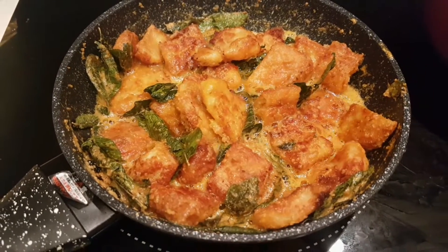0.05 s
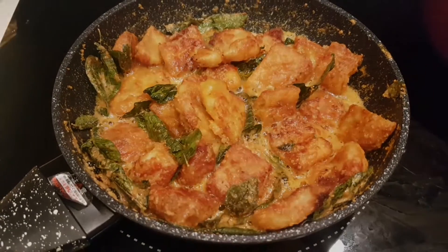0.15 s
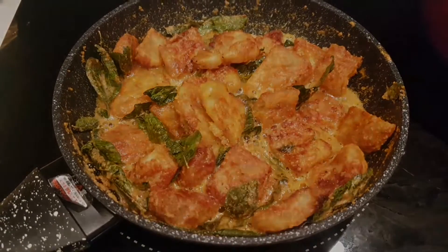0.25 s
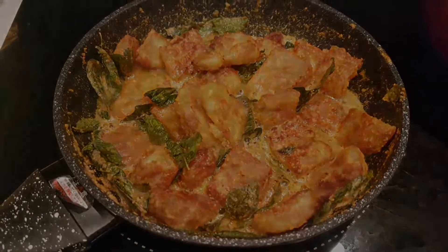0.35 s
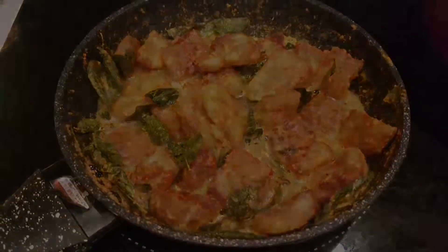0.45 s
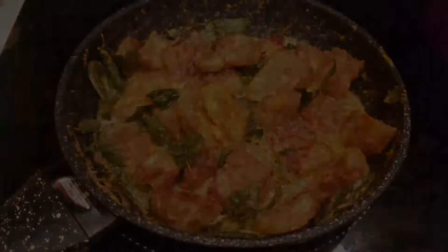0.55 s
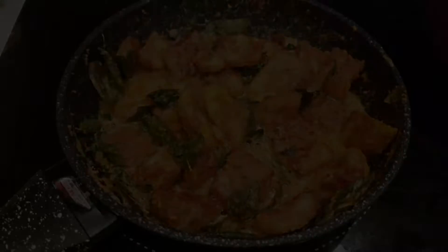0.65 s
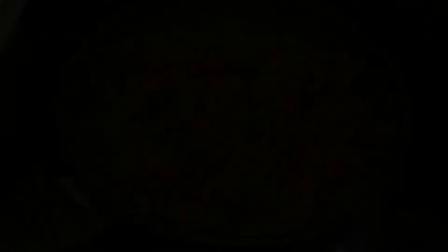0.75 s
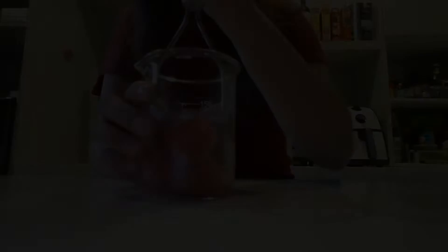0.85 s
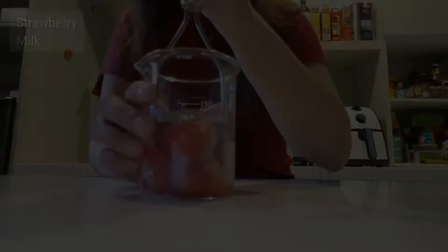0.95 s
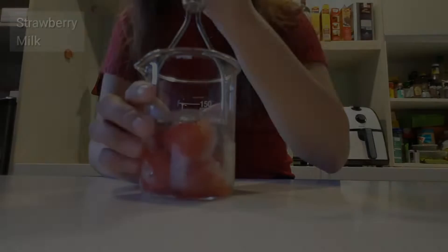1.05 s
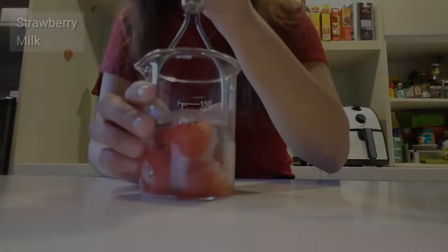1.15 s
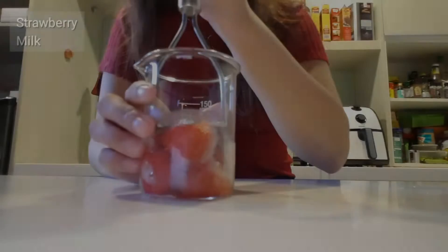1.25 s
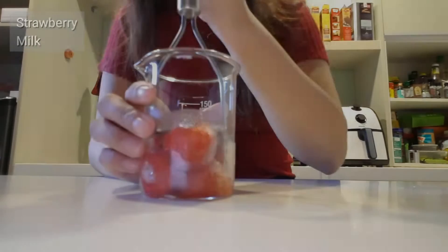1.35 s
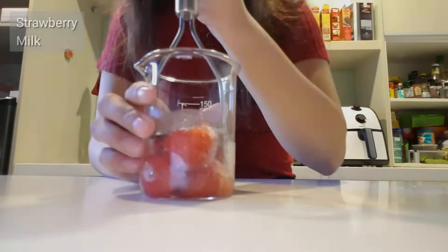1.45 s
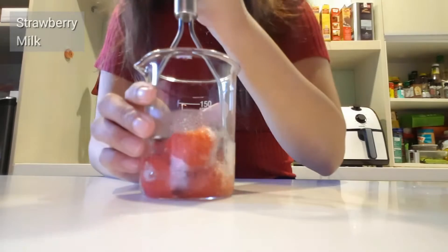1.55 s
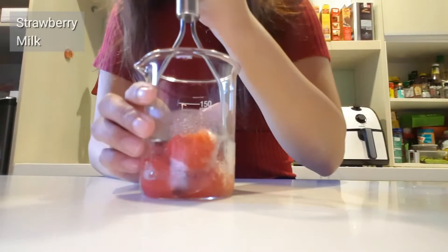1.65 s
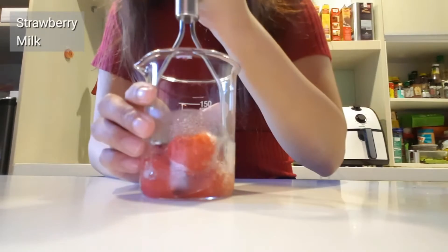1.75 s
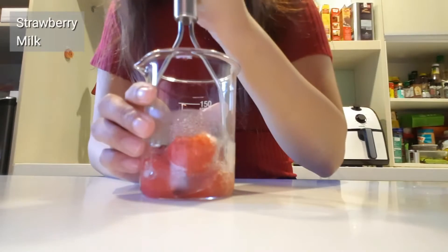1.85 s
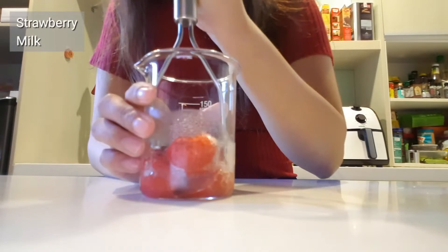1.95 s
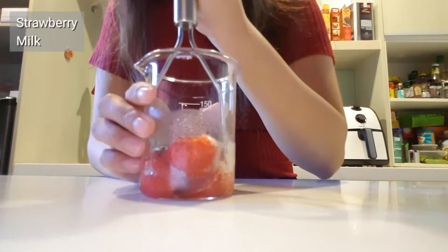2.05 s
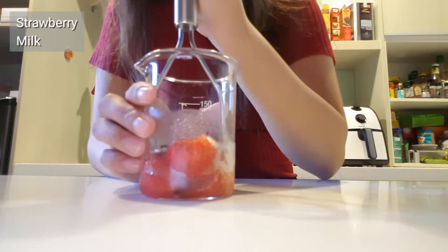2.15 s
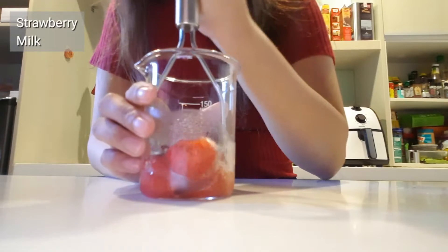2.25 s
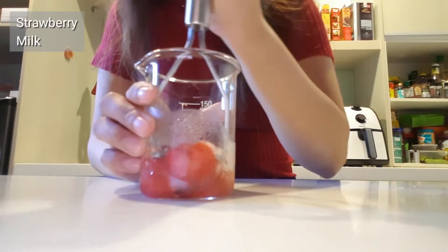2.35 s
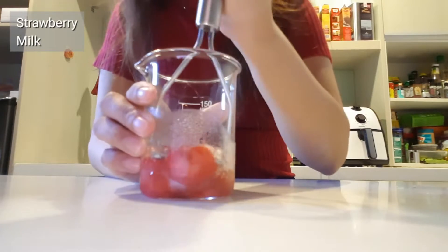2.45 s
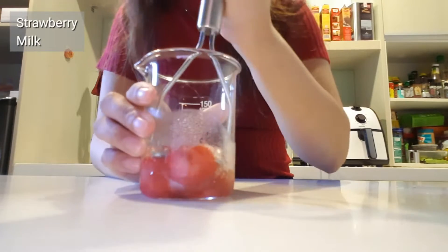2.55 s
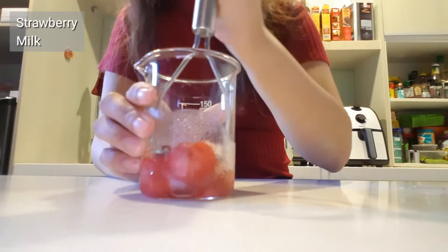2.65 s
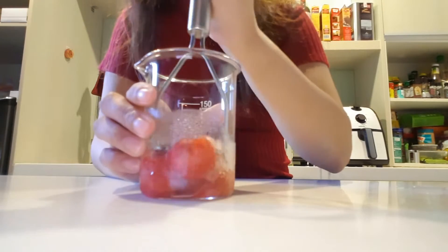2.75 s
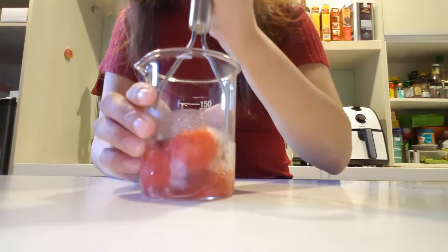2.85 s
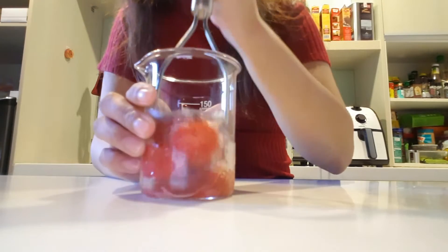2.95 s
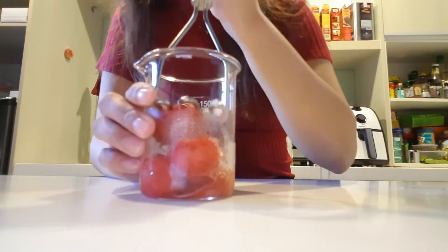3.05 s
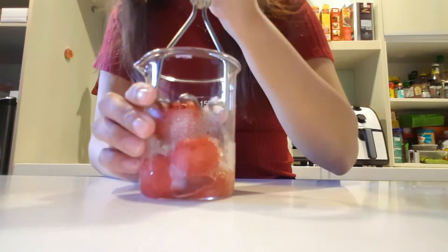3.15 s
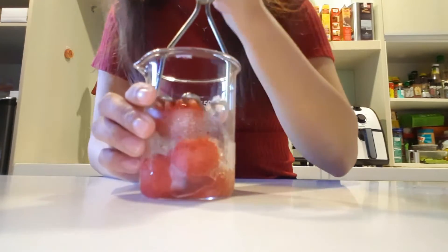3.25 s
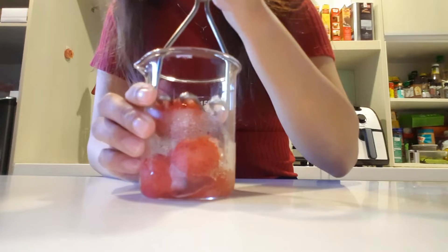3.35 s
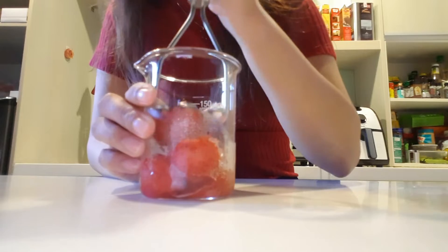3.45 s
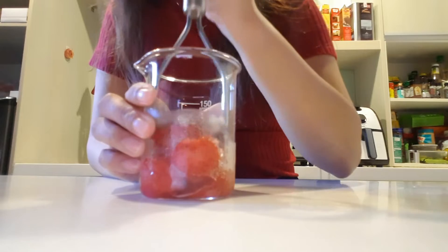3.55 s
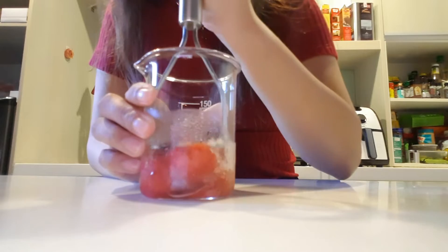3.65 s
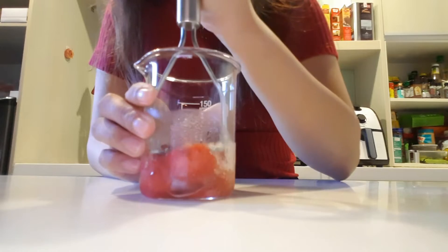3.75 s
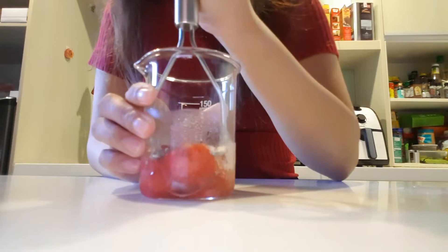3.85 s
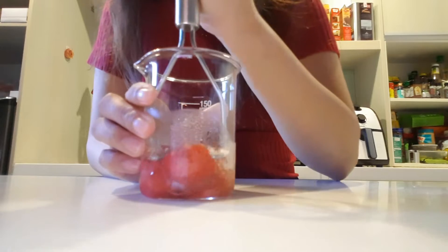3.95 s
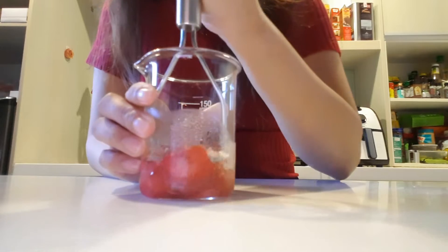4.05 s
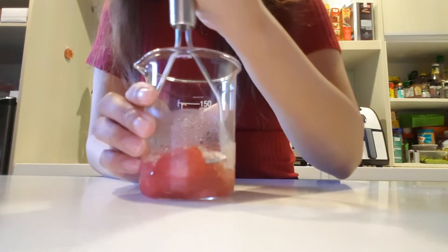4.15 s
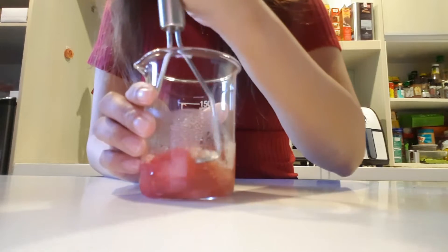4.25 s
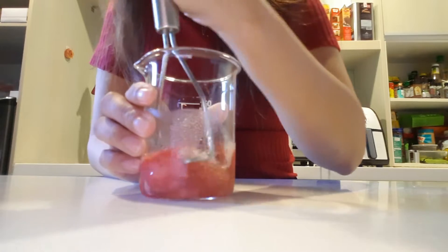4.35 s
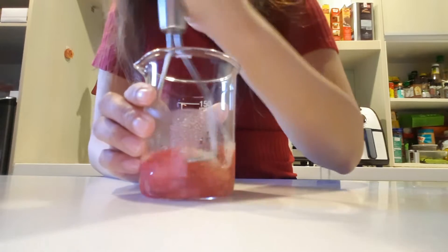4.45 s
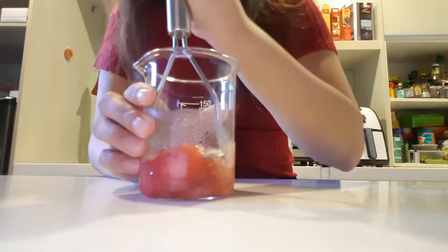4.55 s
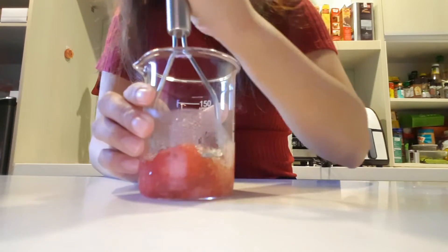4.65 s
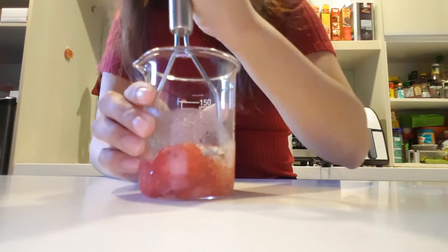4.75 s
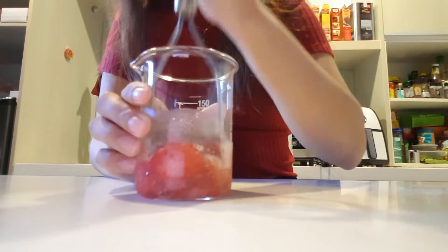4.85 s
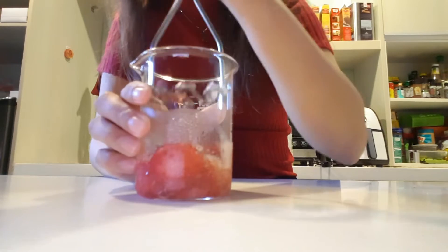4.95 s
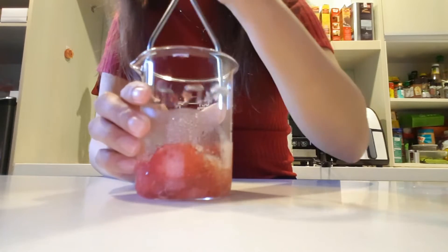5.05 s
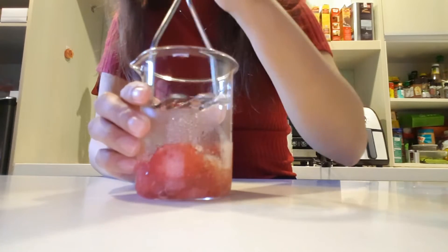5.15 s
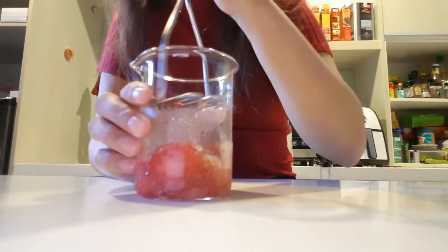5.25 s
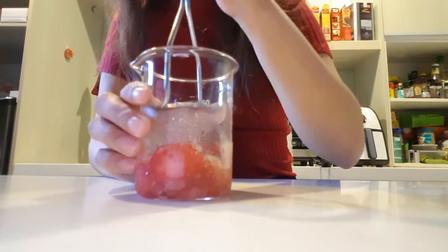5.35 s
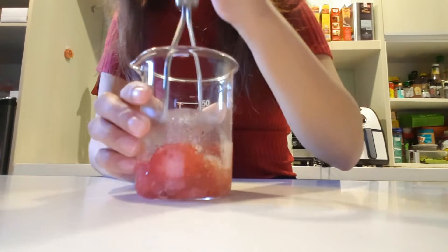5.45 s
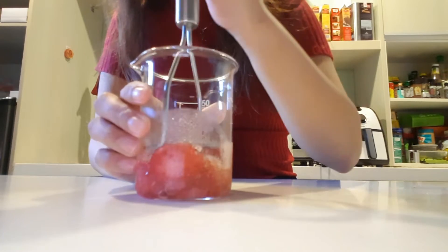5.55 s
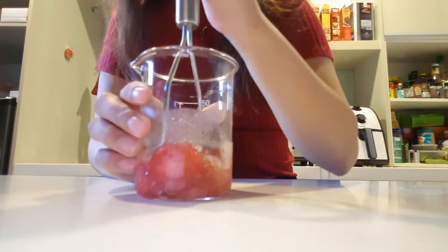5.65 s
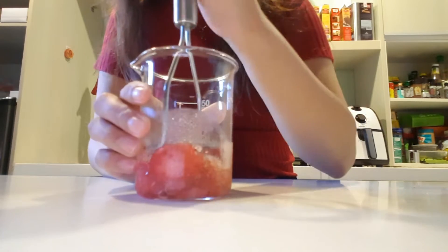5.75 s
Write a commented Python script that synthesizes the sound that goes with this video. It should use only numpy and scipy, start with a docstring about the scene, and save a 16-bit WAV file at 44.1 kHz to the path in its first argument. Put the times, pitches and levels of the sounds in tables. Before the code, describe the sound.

Over steady fan noise, metal wires tap sparsely on glass, then rattle, scrape and squelch densely after two knocks on the counter.

```python
"""A hob hums faintly under a pan and oil spits once; then, over the drone of a kitchen fan, a wire masher
squashes strawberries in a glass beaker. The wire clinks, scrapes and squeaks on the hand-damped wall,
and as the masher is pulled up the beaker knocks twice on the counter. Struck, rubbed and knocked bodies
are sums of decaying modes; juice, pulp, hob and fan are shaped noise, with steady tones in hob and fan."""
import sys
import numpy as np
from scipy import signal
from scipy.fft import rfft, irfft
from scipy.io import wavfile
from scipy.ndimage import uniform_filter1d

SR = 44100
rng = np.random.default_rng(int(sys.argv[2]) if len(sys.argv) > 2 else 0)


def unload_wav(signal):
    """Save mono or channel-first audio to the path in sys.argv[1] as 16-bit WAV at rate SR, clipped to [-1, 1]."""
    wavfile.write(
        sys.argv[1],
        SR,
        np.round(np.clip(np.atleast_2d(signal).T, -1, 1) * 32767).astype(np.int16),
    )


N = 256220  # samples
ATTACK_S = .00035  # time constant with which every mode and crack rises
BODY_DB = 1  # low wall modes against the middle ones, in strikes and squeaks


def amp(db):
    """Decibel law: level to amplitude gain."""
    return 10 ** (np.asarray(db) / 20)


def unit(x):
    """Normalisation: scales a signal to rms 1."""
    return x / np.sqrt(np.mean(x ** 2) + 1e-20)


def read(points, hz):
    """Interpolation on a logarithmic frequency axis."""
    f, value = np.transpose(points)
    return np.interp(np.log(hz + 1), np.log(f + 1), value)


def add(mix, s, sound):
    """Superposition: lays a stereo sound into the mix at time s."""
    part = mix[:, round(s * SR):][:, :sound.shape[1]]
    part += sound[:, :part.shape[1]]


# Wire strikes on glass. Each row: start in seconds, direct rms level of the first 4 ms in dB, left-right
# offset in dB before shading, nearness to the rim as dB on the rim modes, pinch (how far a wire left
# pressing chokes the main ring) in dB, hardness as dB on the treble, stiffening of the wall in semitones.
STRIKES = [(1.0533, -40, 14, -8, 9, -7, 0), (1.1231, -40, 17, 0.5, 16, 3, .3), (1.567, -47, 24, 7, 7, 7, 0),
           (2.6496, -35.5, 2, -3.5, 12, -3, .6), (3.1245, -45.5, 17, -6, 0, 3, .3),
           (3.1899, -28.5, 12, 8, 8, 2.5, 0.15), (3.2002, -24, 7, -11, 9, -6, 0.53),
           (3.4705, -31.5, 20, 5, 5, 0, .3), (3.4983, -16, 5, 10.5, -3.5, 1, 0.29),
           (3.555, -21, 9, -6.5, 13.5, -4, 1.2), (3.8288, -25, 10, -9, 3, -3, 0.028),
           (4.354, -55.5, 0, 6, 11, 12, .5), (4.4428, -41, -0.5, -2, 12, -2, 0.41),
           (4.9994, -31, 5, 5, 11, 6, .4), (5.0775, -19, 9, -7, 1, 2, 1.5),
           (5.0895, -28, 5, -5, 0, -7, -.6), (5.0968, -35, 5, 0, 8, 2, .4), (5.137, -32, 5, -3, 2, -6, .3),
           (5.1398, -27, 10, -2, 9, 0, .7), (5.1499, -21.5, 6, 3.5, 6, -4, 0.67),
           (5.1565, -31, 8, -2, 3, 2, .4), (5.159, -31, 8, -5, 5, 1, .2), (5.1645, -29, 14, -2, 2, -6, -.8),
           (5.3108, -37, 12, 1, -5, -6, .6), (5.3277, -42, 11, 1, 1, 9, 0.086),
           (5.3537, -31, 11, 5, -3, -1, 0.63), (5.385, -37.5, 20, 4, -9, 1, .4),
           (5.428, -31.5, -8, -2, -3, -8, 0.075), (5.4824, -22, -3, 11.5, -15, 7.5, 1.2),
           (5.4945, -30, 1, 2, 19, 1, .6), (5.5048, -31.5, 2, 0, -2, -2, .9),
           (5.5636, -17.5, 1.5, -1.5, 7, -5, 1.2), (5.5773, -28, 9, 10, 2, -1, .5),
           (5.5865, -35, 1, -5, -3, -6, .2), (5.661, -32.5, 12, -11, -4, -10, .3),
           (5.679, -41, 5, 5, 4, -7, .3), (5.7186, -35, -2, 2, 14, 0, 0.27),
           (5.7228, -37.5, 0, 0, -4, 11, .3)]


def clinks():
    """Impact excitation: single strikes come first, a dense rattle later."""
    out = np.zeros((2, N))
    for s, *blow in STRIKES:
        add(out, s - ATTACK_S, strike(*blow))
    return out


def strike(db, pan_db, rim_db, pinch_db, hard_db, semitones, early_gain=0.34):
    """Double contact: each strike touches the wall twice within a millisecond, a lighter touch and then the
    full hit."""
    first = int(.004 * SR)
    lag = int(rng.uniform(.0004, .0008) * SR)
    early_touch, hit = [glass(BODY_DB, hard_db, rim_db, pinch_db, pan_db, semitones=semitones)
                  for touch in range(2)]
    late_hit = np.pad(hit, ((0, 0), (lag, 0)))[:, :-lag]
    tap = early_gain * early_touch + late_hit
    return amp(db) * tap / tap[:, :first].std()


# Modes of the beaker wall, damped by hand and pulp. Each row: frequency in Hz before stiffening, level in
# dB, t60 in seconds before pulp damping, place from -1 near the base to 1 at the rim, dB gained for each
# dB of pinch, share of the stiffening that it follows.
WALL_MODES = [(1070, -16.5, 0.01, 0.36, 0.5, 0), (1790, -3, 0.0073, 0.18, 0, 0.28),
              (2160, -4, 0.008, -0.61, -0.4, 0.21), (2436, -0.5, 0.0079, -0.44, 0.27, 0.25),
              (3260, -2.5, 0.0064, 0.89, -0.12, 0.41), (4554, -14, 0.012, -0.5, 0.28, 0),
              (4997, -2.5, 0.025, 0.02, -0.5, 0), (5290, -8.5, 0.0098, -0.74, 0.43, 0.49),
              (5750, -13, 0.0074, -0.097, 1, 0.2), (6250, -5.5, 0.0078, 1, 0.25, 0.79),
              (6700, -17, 0.0075, 0.73, 0, 0.84), (7810, -3.5, 0.0061, -0.36, 0, 0.78),
              (8670, -8, 0.014, 0.43, 0, 0.047), (9150, -6.5, 0.0057, 0.9, 0.42, 0.29),
              (10840, -10.5, 0.0058, 0.16, 0.5, 0.34), (12000, -16, 0.016, 0.62, 0, 0.019),
              (13350, -11, 0.0075, 0.44, 0, 0), (14500, -21, .005, 0.39, 1, 0),
              (15800, -15, .0088, .3, 0.5, 0)]
# Faint, mostly longer ring of the steel wires. Each row: frequency in Hz, level in dB, t60 in seconds.
WIRE_MODES = [(2520, -47, 0.38), (4390, -41, 0.13), (5000, -58, 0.62), (5250, -62, 0.093),
              (5360, -55, 0.17), (8769, -65, 0.43)]
# Mean phase of the wall's sound at two microphones. Each row: frequency in Hz, lead of left in radians.
WALL_LEAD = [(1100, -1.5), (2500, -2), (3300, -5), (5000, -7), (6200, -7), (9500, -7.5), (16000, -8.5)]
# The beaker shades the far microphone. Each row: frequency in Hz, share of the left-right offset.
SHADING = [(3000, 1), (5000, 0.13), (9000, 0.07)]
PULP_DAMPING = 0.59  # dB of decay time for each dB of nearness to the rim, when that is negative
CRACK_DB, CRACK_T60_S = -18, .012  # the crack's level before hardness is added


def glass(low_db, high_db, rim_db, pinch_db, pan_db, wire_db=0, detune=0.0058, semitones=0,
          phase_scatter=0.77, crack_hz=900):
    """Modal vibration: wall and wires ring with a brief crack; harder contact favours the high modes."""
    stiffer = 2 ** (semitones / 12)
    damping = amp(PULP_DAMPING * min(rim_db, 0))  # pulp shortens the ring near the base
    wall = [(hz * stiffer ** follows, db + rim * rim_db + pinch * pinch_db, t60 * damping)
            for hz, db, t60, rim, pinch, follows in WALL_MODES]
    wires = [(hz, db + wire_db, t60) for hz, db, t60 in WIRE_MODES]
    modes = np.array(wall + wires)
    hz = modes[:, 0]
    modes[:, 1] += read([(3400, low_db), (4600, 0), (6400, 0), (8300, high_db)], hz)
    lead = read(WALL_LEAD, hz) + phase_scatter * rng.standard_normal(len(hz))
    tone = ring(modes, lead, pan_db * read(SHADING, hz), scatter_db=1.46, detune=detune)
    t = np.arange(tone.shape[1]) / SR
    high_pass = signal.butter(2, crack_hz, "high", fs=SR)
    crack = signal.lfilter(*high_pass, rng.standard_normal(tone.shape))
    envelope = 1000. ** (-t / CRACK_T60_S) * (1 - np.exp(-t / ATTACK_S))
    return tone + amp(CRACK_DB + high_db) * crack * envelope


def ring(modes, lead, pan_db, scatter_db=0, detune=0):
    """Modal superposition: each mode reaches two microphones with its own phase lead and level offset."""
    left = np.exp(.5j * lead) * amp(pan_db / 2)
    return (np.array([left, 1 / left]) @ decaying(modes, scatter_db, detune)).imag


def decaying(modes, scatter_db, detune):
    """Exponential decay: one complex dying wave a mode, optionally scattered in level and frequency."""
    hz, db, t60 = np.transpose(modes)[:, :, None]
    t = np.arange(SR // 4) / SR
    strength, shift = rng.standard_normal((2, len(modes), 1))
    sign = (-1) ** np.arange(len(modes))[:, None]
    pole = 2j * np.pi * hz * (1 + detune * shift) - np.log(1000) / t60
    return sign * amp(db + scatter_db * strength) * np.exp(pole * t) * (1 - np.exp(-t / ATTACK_S))


# The base meets the counter. Each row: start in seconds, direct peak level in dB, left-right offset in dB,
# landing edge as dB on the far-edge modes, frequency in Hz above which the blow softens.
BASE_KNOCKS = [(4.9962, -2.8, .5, -5, 5200), (5.0359, -1.2, .5, 5, 4100)]
# Modes of the base on the counter. Each row: frequency in Hz, level in dB, t60 in seconds, place from about
# -1 at the near edge to 1 at the far edge.
BASE_MODES = [(325, -22, 0.04, -.6), (550, -16, 0.012, -1.4), (1176, 8, 0.011, 0),
              (1146, -16, 0.092, -0.041), (1390, 0.5, 0.0093, -0.16), (1984, -16, 0.049, -.6),
              (2320, -5, 0.012, 1), (2580, -18, 0.05, 0), (2800, -11, 0.013, -.8), (3100, -19, 0.013, 0.98),
              (3480, -8.5, 0.0074, 0.75), (4070, -13, 0.0056, -0.7), (2060, -9.5, 0.013, -1.05),
              (2344, -22, 0.086, 0.18)]


def knocks(lead_per_hz=0.00041):
    """Position-dependent excitation: one edge lands after the other, each waking its share of the modes."""
    out = np.zeros((2, N))
    for s, db, pan_db, edge_db, soft_hz in BASE_KNOCKS:
        modes = np.array([(hz, level + edge * edge_db, t60) for hz, level, t60, edge in BASE_MODES])
        sound = ring(modes, lead_per_hz * modes[:, 0], pan_db)  # lead in radians
        blow = signal.lfilter(*signal.butter(4, soft_hz, fs=SR), sound)
        add(out, s, amp(db) * blow / abs(blow).max())
    return out


# Wire slides on glass. Each row: start in seconds, length in seconds, direct rms level in dB, level of the
# high modes in dB.
SLIDES = [(5.089, 0.015, -35, -2), (5.113, 0.036, -34.5, -8), (5.15, .022, -32, 1),
          (5.299, .018, -36, -1.5), (5.324, 0.04, -46, 9), (5.424, 0.013, -42, -3), (5.488, 0.027, -46, 4),
          (5.584, 0.018, -41.5, 0)]


def scrapes(pan_db=5.0, low_db=2.0, rim_db=-7.0, pinch_db=5, wire_db=13.0):
    """Irregular stick-slip: four wires drag in trains of tiny taps, each detuning the glass its own way."""
    out = np.zeros((2, N))
    slips_per_s, spread_db, detune = 300, 4.5, .03  # rate for each wire; detune as a share of frequency
    for s, length, db, high_db in SLIDES:
        n, rub = int(length * SR), 0
        for wire in range(4):
            chance, size, side = rng.random((3, SR // 4))[:, :n]
            strength = amp(spread_db * np.minimum(-np.log(size), 3))
            slips = strength * np.sign(side - .5) * (chance < slips_per_s / SR)
            stroke = slips * signal.windows.tukey(n, .4)
            wall = glass(low_db, high_db, rim_db, pinch_db, pan_db, wire_db, detune)
            rub = rub + signal.fftconvolve(stroke[None], wall, axes=1)
        add(out, s, amp(db) * rub / (rub[:, :n].std() + 1e-9))
    return out


# Wire squeaks on wet glass. Each row: start in seconds, length in seconds, direct rms level in dB, nearness
# to the rim in dB, level of the high modes in dB.
GRIPS = [(5.120, .029, -30, -4, -9), (5.156, 0.016, -33.5, -6, -5), (5.351, .017, -40, 3, -2)]
# Mean slip rate of each squeak. Each row: rate at the start, middle and end in slips per second.
SLIP_RATES = [(868, 889, 872), (790, 800, 808), (985, 1005, 1110)]


def squeaks(pan_db=5, pinch_db=6, wire_db=14, rub_db=-9):
    """Periodic stick-slip: the wall sings on multiples of a nearly regular slip rate, over a rough rub."""
    out = np.zeros((2, N))
    waver, uneven_db = .022, 3.5  # rms share of the rate; rms unevenness of the slips
    for (s, length, db, rim_db, high_db), rates in zip(GRIPS, SLIP_RATES):
        n = int(length * SR)
        drift, size, rub = rng.standard_normal((3, SR // 4))[:, :n]
        glide = np.interp(np.linspace(0, 2, n), [0, 1, 2], rates)
        hz = glide * (1 + waver * unit(uniform_filter1d(drift, size=60)))
        cycles = np.floor(np.cumsum(hz) / SR)
        slips = np.diff(cycles, prepend=0) * amp(uneven_db * size)
        stroke = (unit(slips) + amp(rub_db) * rub) * signal.windows.tukey(n, .4)
        wall = glass(BODY_DB, high_db, rim_db, pinch_db, pan_db, wire_db)
        squeak = signal.fftconvolve(stroke[None], wall, axes=1)
        add(out, s, amp(db) * squeak / squeak[:, :n].std())
    return out


# Spectrum of the juice fizz. Each row: frequency in Hz, relative level in dB.
FIZZ_SPECTRUM = [(1500, 15.5), (2500, 8.5), (3800, 7.5), (4300, 5.5), (5000, 9), (5700, 2), (6700, 0),
                 (8500, 6), (10000, 1.5), (11200, 10), (12000, 5), (13000, 7.5), (15700, 9)]
# Berries give way. Each row: start in seconds, length in seconds, rms level in dB at the height of the swell.
COLLAPSES = [(1.449, 0.06, -41), (1.756, 0.15, -45), (2.424, 0.25, -46)]
# Spectrum of the collapsing pulp. Each row: frequency in Hz, relative level in dB.
PULP_SPECTRUM = [(400, -27), (800, -2), (1150, 9), (1650, 0.5), (2500, -11), (5000, -23), (12000, -22.5)]


def fruit(pops_per_s=450, pop_db=5.0, pop_share=0.82, split_hz=9500):
    """Modulated turbulence: juice spurts unevenly through bursting cells; now and then a berry collapses."""
    t, hz = np.arange(N) / SR, np.fft.rfftfreq(N, 1 / SR)
    spurt_hz, spurt_db = 55, 1.4  # fastest flicker; its rms depth
    size = amp(pop_db * np.minimum(rng.exponential(1, (2, N)), 5))
    pops = size * (rng.random((2, N)) < pops_per_s / SR)
    colour = amp(read(FIZZ_SPECTRUM, hz)) * (hz > FIZZ_SPECTRUM[0][0])
    pops = unit(irfft(rfft(pops) * colour, N))
    fizz = unit(wash(FIZZ_SPECTRUM) + pop_share * pops)
    top = irfft(rfft(fizz) * (hz > split_hz), N)
    spurts = unit(irfft(rfft(rng.standard_normal(N)) * (hz < spurt_hz), N))
    pressed = pressure(t, False) * (fizz - top) + pressure(t, True) * top
    out = amp(spurt_db * spurts) * pressed
    pulp = wash(PULP_SPECTRUM)
    for s, length, db in COLLAPSES:
        out += amp(db) * pulp * np.sin(np.pi * np.clip((t - s) / length, 0, 1))
    return out


# Pushes on the fruit. Each row: peak in seconds, level of the wet fizz in dB, build-up in seconds and release
# in seconds (each for a tenfold change), dB added to the upper treble, lift-off of the masher in seconds.
PRESSES = [(1.47, -56.5, 0.3, 0.68, -3, 1.79), (1.81, -56, 0.076, 2.3, -2, 2.66),
           (2.6, -50, 0.88, 0.5, -5, 2.74), (3.77, -55, 0.037, 2.7, -8, 4.9),
           (5.34, -36, 0.059, 0.1, -13, 5.39), (5.505, -38, .022, 0.062, 1, 5.7),
           (5.720, -35, 0.028, 0.035, 2, 5.85)]
LIFT_S = 0.1  # time for a further tenfold fall once the masher lifts


def pressure(t, upper):
    """Exponential build-up and release, dying faster after lift-off; upper picks the upper treble's level."""
    pushes = []
    for s, db, build, release, top_db, lift in PRESSES:
        decades = np.maximum((s - t) / build, (t - s) / release) + np.maximum(t - lift, 0) / LIFT_S
        pushes.append(amp(db + upper * top_db) * 10 ** -decades)
    return np.linalg.norm(pushes, axis=0)


# Air bursts out of the pulp. Each row: start in seconds, level in dB before the attack and left-right offset,
# pitch in Hz, t60 in seconds.
AIR_POCKETS = [(2.6507, -23, 3560, 0.014), (4.4433, -31, 3160, 0.007), (4.6718, -24.5, 1040, 0.0072),
               (5.7188, -34, 3630, 0.025)]


def bubbles(pan_db=5.0):
    """Bubble resonance: each pocket of air rings briefly at one pitch as it opens."""
    out = np.zeros((2, N))
    for s, db, hz, t60 in AIR_POCKETS:
        add(out, s, amp(db) * ring([(hz, 0, t60)], np.zeros(1), pan_db))
    return out


def thud(s=5.705, db=-47, length=0.08):
    """Low-frequency forcing: the masher comes down on the pulp and pushes dully on the counter."""
    push = np.sin(np.pi * np.clip((np.arange(N) / SR - s) / length, 0, 1))
    return amp(db) * push * wash([(25, -30), (50, -9), (70, 3.0), (90, -3), (130, -3.0)])  # (Hz, dB)


# The pan rings under the spit. Each row: frequency in Hz, level in dB, t60 in seconds.
PAN_MODES = [(1770, -39, 0.02), (3520, -50, .06), (6600, -51, .02)]
SPIT_AT_S = .8908


def spit(db=-42, t60=0.084):
    """Burst and resonance: one spit of oil is a decaying hiss that sets the pan ringing briefly."""
    age = np.arange(N) / SR - SPIT_AT_S
    colour = [(800, -6), (1800, -2), (2800, -3), (4400, -7), (9000, -11), (15700, -6)]  # (Hz, dB)
    out = amp(db) * wash(colour) * 1000. ** (-abs(age) / t60) * (age > 0)
    add(out, SPIT_AT_S, ring(PAN_MODES, np.zeros(len(PAN_MODES)), 0))
    return out


# Broad noise of the fan, its treble hiss and the hob. Each row: frequency in Hz, relative level in dB.
FAN_SPECTRUM = [(25, -28), (45, -9.5), (120, -7), (170, 0.5), (320, 1.5), (450, -0.5), (580, -3.5),
                (660, -8.5), (840, -11), (960, -9), (1350, -7.5), (1520, -16.5), (2700, -22.5),
                (3200, -30.5)]
HISS_SPECTRUM = [(2500, 1), (3300, -3.5), (4200, -5), (6000, -5.5), (10000, -9), (15700, -10.5)]
HOB_SPECTRUM = [(15, -43.5), (25, -23), (43, -6), (76, -7), (108, -1), (195, -10.5), (344, -7), (451, -15),
                (545, -14.5), (1610, -24), (2050, -25.5), (11900, -45), (16000, -41)]
# Fan motor tones. Each row: frequency in Hz, rms level in dB, width in Hz, steady share of power from 0 to 1.
MOTOR_TONES = [(239, -48.3, 4.5, .3), (324, -49.3, 5.8, 0), (334.8, -46.9, 2.5, .45),
               (377.3, -50.5, 2.5, .55), (451, -56.5, 4, .2), (585, -58, 5, .2), (670.5, -56, 3, .6),
               (755, -63, 3, .3), (974, -59, 9, .1), (1271, -59, 8, .2), (1341, -52.8, 4, .5),
               (1375, -60, 14, 0), (2023, -64.5, 6.4, 0)]
FAN_START_S, HOB_FADE_S, FAN_FADE_S = .951, .006, .007


def background(fan_db=-40.0, hiss_db=-62, hob_db=-47.2, hum_db=-48.5, hum_hz=100):
    """Noise and tones in sum: the hob fades out quickly, and the fan fades in at once after it."""
    t = np.arange(N) / SR
    hob = amp(hob_db) * wash(HOB_SPECTRUM) + amp(hum_db) * unit(np.sin(2 * np.pi * hum_hz * t))
    fan = amp(fan_db) * wash(FAN_SPECTRUM) + amp(hiss_db) * wash(HISS_SPECTRUM) + tones(MOTOR_TONES)
    hob_gain = np.clip((FAN_START_S - t) / HOB_FADE_S, 0, 1)
    fan_gain = np.clip((t - FAN_START_S) / FAN_FADE_S, 0, 1)
    return hob * hob_gain + fan * fan_gain


def tones(rows):
    """Line broadening: a motor tone has a steady core and a part that wavers within its own width."""
    t, out = np.arange(N) / SR, 0
    for f, db, width, steady in rows:
        apart = np.arccos(read(LIKENESS, f))  # phase between the microphones
        phase = 2 * np.pi * rng.random() + np.array([[0], [apart]])
        core = unit(np.sin(2 * np.pi * f * t + phase))
        waver = noise(lambda hz: 1 / (1 + ((hz - f) / width) ** 2))
        out = out + amp(db) * (np.sqrt(steady) * core + np.sqrt(1 - steady) * waver)
    return out


def wash(spectrum):
    """Spectral shaping: broad noise that dies away above its last point."""
    last_hz = spectrum[-1][0]
    return noise(lambda hz: amp(read(spectrum, hz)) / np.hypot(1, (hz / last_hz / 1.16) ** 4))


# Likeness of diffuse sound at the two microphones. Each row: frequency in Hz, left-right likeness.
LIKENESS = [(60, 0.9), (200, 0.95), (400, 0.83), (700, 0.51), (1400, 0.052), (4000, 0.025), (15000, .05)]


def noise(gain_at):
    """Diffuse-field coherence: noise of rms 1 on which the microphones agree mainly in the bass."""
    hz = np.fft.rfftfreq(N, 1 / SR)
    a, b = rfft(rng.standard_normal((2, N)))
    same = read(LIKENESS, hz)
    pair = np.array([a, same * a + np.sqrt(1 - same ** 2) * b])
    return unit(irfft(pair * gain_at(hz), N))


def echoes(x, decays, delay):
    """Reverberation: dense reflections of random sign, each band dying at its own speed."""
    hz, t, z = signal.stft(rng.choice([-1., 1.], (2, SR // 2)), SR, nperseg=128)
    tail = signal.istft(z * 1000. ** (-t / read(decays, hz)[:, None]), SR, nperseg=128)[1]
    tail = np.pad(tail, ((0, 0), (round(delay * SR), 0)))
    return signal.fftconvolve(x, tail / np.linalg.norm(tail[0]), axes=1)[:, :N]


# Decay of the kitchen. Each row: frequency in Hz, t60 in seconds.
KITCHEN_DECAY = [(300, 0.73), (1200, 0.72), (2500, 0.41), (3300, 0.45), (4400, 0.38), (5600, 0.36),
                 (9000, 0.47), (15000, 0.49)]


def scene(near_db=-11, room_db=-14, knock_near_db=-10.5, knock_room_db=-13):
    """Early and late reflection: counter and arms answer each contact at once, the kitchen later."""
    wall, base = clinks() + scrapes() + squeaks(), knocks()
    # near decays as (Hz, t60 s), delays in seconds
    near = echoes(amp(near_db) * wall, [(1200, 0.068), (3300, 0.035), (5500, 0.023), (14000, 0.0093)], 0.0018)
    near += echoes(amp(knock_near_db) * base,
                   [(500, 0.18), (1200, 0.049), (2400, 0.43), (3500, 0.079), (5000, 0.017)], 0.002825)
    far = echoes(amp(room_db) * wall + amp(knock_room_db) * base, KITCHEN_DECAY, .007)
    return wall + base + near + far + fruit() + bubbles() + thud() + spit() + background()


def record(dry, edge_hz=16050):
    """Band limiting: a steep linear-phase low-pass removes the highest treble."""
    low_pass = signal.firwin(401, edge_hz, window=("kaiser", 9), fs=SR)
    return signal.oaconvolve(dry, low_pass[None], "same")


dry = scene()
out = record(dry)
unload_wav(out)
```